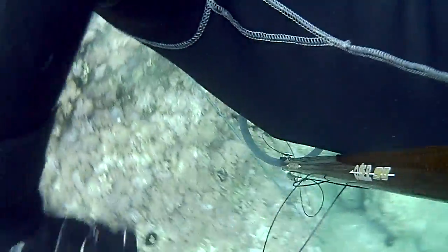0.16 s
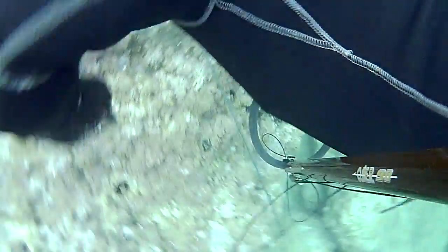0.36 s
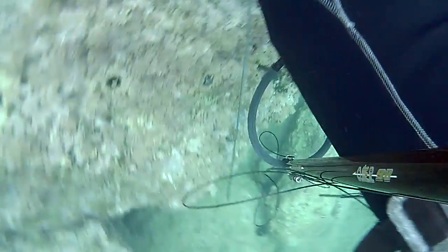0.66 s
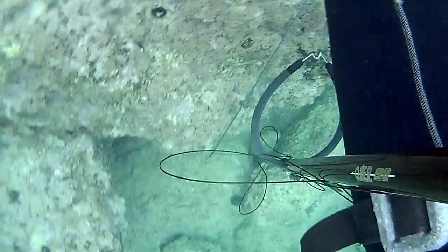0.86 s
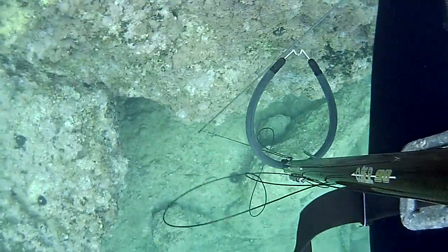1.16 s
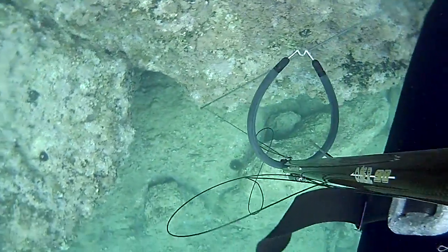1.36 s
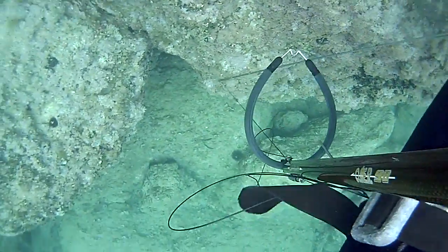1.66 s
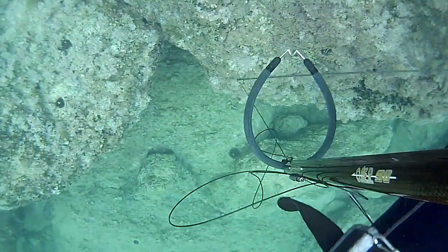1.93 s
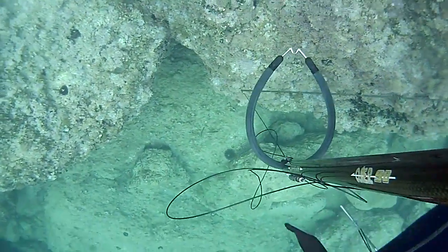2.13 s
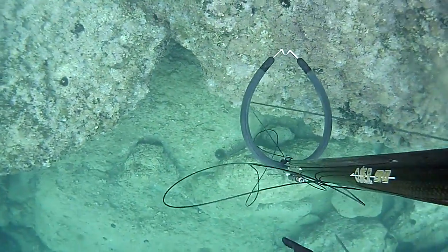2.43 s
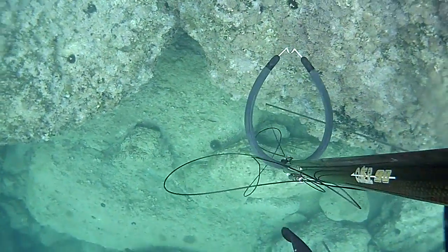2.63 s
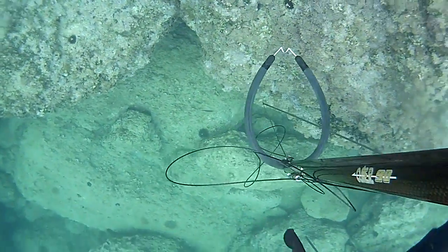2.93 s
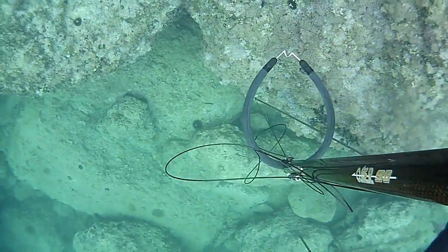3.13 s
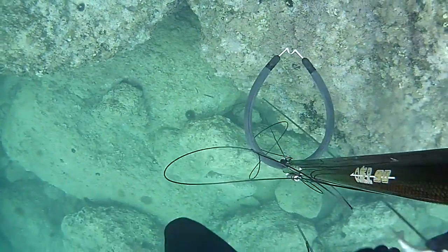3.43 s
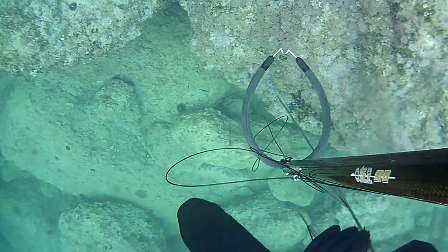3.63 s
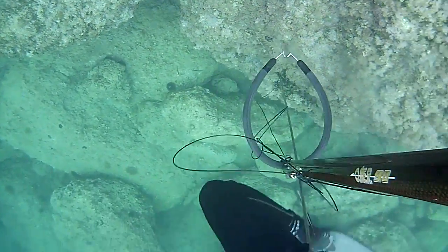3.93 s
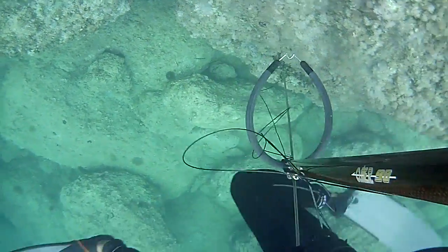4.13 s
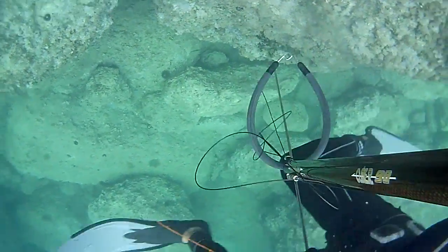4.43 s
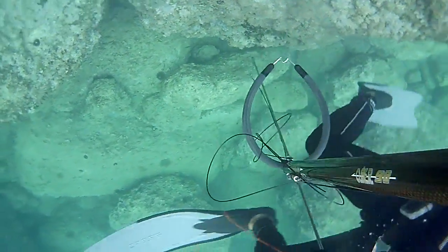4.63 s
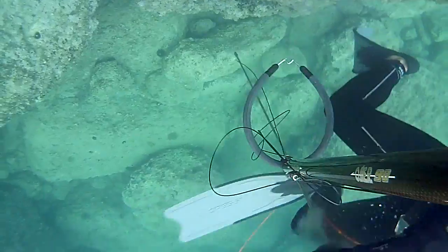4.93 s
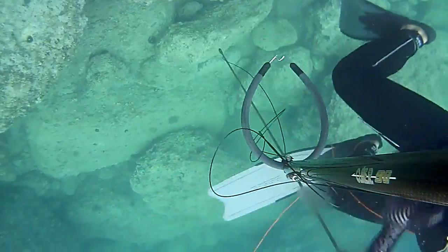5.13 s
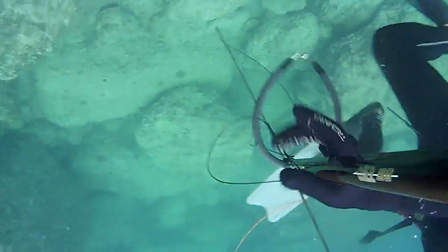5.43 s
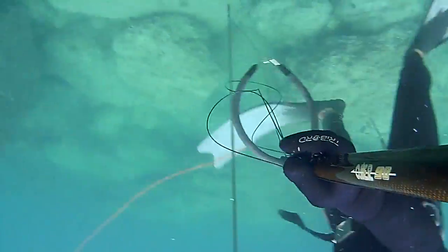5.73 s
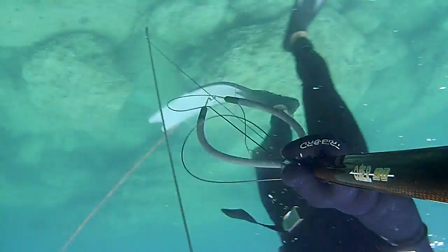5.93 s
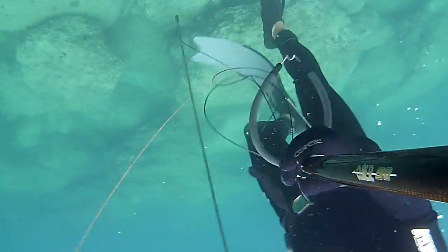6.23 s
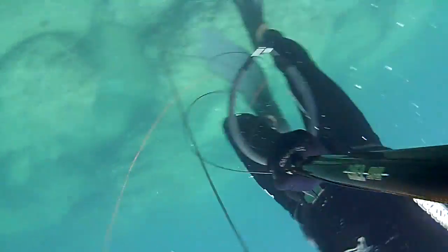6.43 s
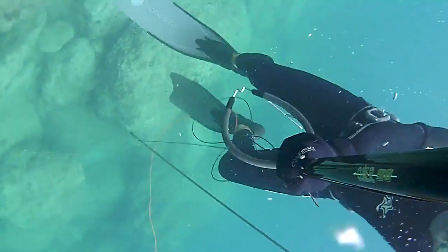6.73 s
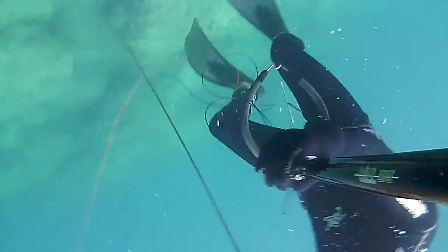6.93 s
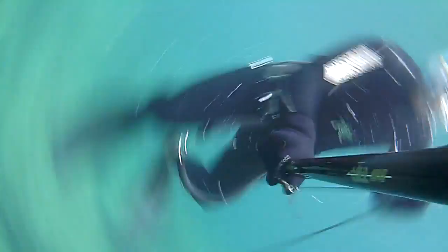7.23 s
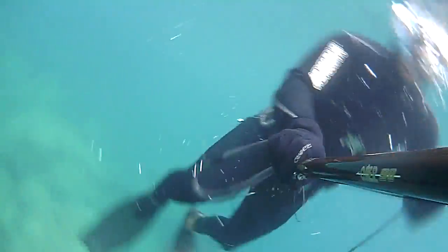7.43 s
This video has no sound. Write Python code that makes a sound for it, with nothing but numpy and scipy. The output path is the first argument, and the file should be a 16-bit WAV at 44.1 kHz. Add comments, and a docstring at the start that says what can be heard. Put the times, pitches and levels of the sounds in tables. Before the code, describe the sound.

Close, dull underwater handling noise from a sealed housing fixed to a wooden speargun. Hollow knocks with a short boxy ring tumble irregularly, burst hard near one second, then thin to faint ticks of loose shaft and line. A sudden very loud knock after four seconds starts dense bumping and rubbing that lasts to the end, with low water rumble. Narrow-band, nearly mono, the loudest hits distort.

```python
"""Knocks on the wooden stock of a speargun, heard from inside a sealed camera housing that rides on it while a diver
climbs, handling gun and line: they travel through the wood and the air space of the housing rings near 500 Hz.
The loose steel shaft and line tick, made as damped sines with a rattle; glove, water and rubber rub on the gun,
made as random slips and noise shaking damped modes of stock, housing and air space.
One narrow-band microphone feeds both channels, the left a little late, and the loudest knocks overload it."""
import sys
import numpy as np
from scipy import signal
from scipy.fft import rfft, irfft
from scipy.io import wavfile

SR = 44100
rng = np.random.default_rng(int(sys.argv[2]) if len(sys.argv) > 2 else 0)


def master_out(mix):
    """Clip the mix to full scale and print it as 16-bit PCM to the path in sys.argv[1]."""
    frames = np.transpose(np.atleast_2d(mix))
    ceiling = np.clip(frames, -1, 1)
    pcm = np.round(ceiling * 32767).astype(np.int16)
    wavfile.write(sys.argv[1], SR, pcm)


N = 333837   # length in samples


def from_db(db):
    """Amplitude factor of a level in dB."""
    return 10 ** (np.asarray(db) / 20)


def rms_one(x):
    """Scale a signal to an rms of 1."""
    return x / np.sqrt(np.mean(x ** 2) + 1e-20)


def in_time(rows):
    """Each column after the first, drawn as straight lines between the times in the first."""
    seconds, *columns = np.transpose(rows)
    return [np.interp(np.arange(N) / SR, seconds, column) for column in columns]


def low_pass(x, hz, order=2):
    """Keep what lies below hz."""
    return signal.sosfilt(signal.butter(order, hz, fs=SR, output="sos"), x)


def high_pass(x, hz, order=2):
    """Keep what lies above hz."""
    return signal.sosfilt(signal.butter(order, hz, "high", fs=SR, output="sos"), x)


def ring(drive, hz, t60):
    """A damped mode: a unit click sets a sine ringing from height 1, down 60 dB after t60 seconds."""
    radius = from_db(-60 / (t60 * SR))
    angle = 2 * np.pi * hz / SR
    # the tiny offset keeps the filter out of denormal numbers
    return signal.lfilter([0, np.sin(angle)], [1, -2 * radius * np.cos(angle), radius ** 2], drive + 1e-18)


def wander(rate_hz, depth_db):
    """A gain that wanders at random: slow noise, its rms depth in dB."""
    return from_db(depth_db * rms_one(low_pass(rng.standard_normal(N), rate_hz)))


def body(drive, modes, colour_db=0):
    """All modes of one part, signs alternating; how hard each is driven wanders, so the colour keeps shifting."""
    out = np.zeros(N)
    for k, (hz, db, t60) in enumerate(modes):
        wandering_drive = drive * wander(25, colour_db)
        out += (-1) ** k * from_db(db) * ring(wandering_drive, hz, t60)
    return out


def grains(per_s, size_db):
    """Slips at random moments and of random sign, a few much larger than the rest."""
    sizes = from_db(size_db * np.minimum(rng.exponential(1, N), 4))
    signs = rng.choice([-1, 1], N)
    return sizes * signs * (rng.random(N) < per_s / SR)


# Modes of the housing walls around the microphone.
# Each row: pitch in Hz, drive in dB against the other rows, t60 in seconds.
WALL_MODES = [(685, 2, 0.033), (790, -2, 0.028), (894, -4.5, 0.031), (1150, 3, 0.01), (1263, -0.5, 0.012),
              (1387, -2, 0.016), (1811, -14.5, 0.033)]


def walls(x):
    """Housing walls shaken by x; their modes fall off steeply above their range."""
    return low_pass(body(x, WALL_MODES, colour_db=4.0), 3000, order=6)


# Modes of the lens port and mount.
# Each row: pitch in Hz, drive in dB against the other rows, t60 in seconds.
PORT_MODES = [(1640, -4.5, 0.024), (1994, -5.5, 0.023), (2230, 1, 0.0028), (2588, -4, 0.013),
              (2970, -10, 0.021), (3150, 1, 0.0062), (3504, 1.5, 0.0071)]


def port(x):
    """Lens port and mount shaken by x; their modes carry little below their range."""
    return high_pass(body(x, PORT_MODES, colour_db=3.5), 1700, order=4)


def scraped(envelope, part, per_s):
    """Slips under a contact envelope shake one part; a steady envelope of 1 gives an rms of about 1."""
    slips = grains(per_s, size_db=2.0)
    return part(envelope * slips) / np.std(part(slips))


# Modes of the wooden stock, kept rumbling by the water and struck by the knocks.
# Each row: pitch in Hz, drive in dB against the other rows, t60 in seconds.
STOCK_MODES = [(64, -14.5, 0.033), (120.4, 1, .12), (217.3, 8, 0.032), (299, -3, 0.054)]


def water_rumble():
    """Water dragging past drives the stock with surging noise, and is heard itself below 60 Hz."""
    water = rng.standard_normal(N) * wander(12, 2.5)
    stock = low_pass(body(water, STOCK_MODES, colour_db=3.5), 260)
    return rms_one(stock) + 0.36 * rms_one(low_pass(water, 60))


def stock_thud(times, peak_db, spread_db=3.0):
    """Each blow pushes inward and strikes every stock mode with a strength of its own."""
    at = (np.asarray(times) * SR).astype(int)
    luck_db = spread_db * rng.standard_normal((len(at), len(STOCK_MODES)))
    out = np.zeros(N)
    for k, (hz, db, t60) in enumerate(STOCK_MODES):
        clicks = np.zeros(N)
        clicks[at] = -from_db(peak_db + db + luck_db[:, k])
        out += ring(clicks, hz, t60)
    return low_pass(out, 1100)


STIR_T60_S = 0.16
# Rubbing stirred up by a knock, in dB against it before smoothing: ring, rumble, grit, fine grit.
STIR_DB = (-20, -17, -29.5, -50)


def stir():
    """Unrest of the grip: it jumps with every knock, since each leaves the grip shifting, and settles."""
    rows = np.array(KNOCKS)
    kicks = np.zeros(N)
    kicks[(rows[:, 0] * SR).astype(int)] = from_db(np.minimum(rows[:, 1], -3))
    settling = signal.lfilter([1], [1, -from_db(-60 / (STIR_T60_S * SR))], kicks)
    return low_pass(settling, 43, order=1)


# Modes of the air space in the housing under steady rubbing.
# Each row: pitch in Hz, drive in dB against the other rows, t60 in seconds.
CAVITY_MODES = [(493.1, 10, 0.023), (473.5, 10, 0.034)]
# Glove, water and rubber dragging on the gun, before the grip's unrest is added.
# Each row: time in seconds, then the rms levels in dB of ring, rumble, grit and fine grit.
RUBBING = [(0.0, -29, -33.5, -46, -76), (0.36, -26.5, -39, -39, -59), (0.53, -42, -63.5, -74, -73),
           (0.78, -61, -59, -49, -62.5), (0.95, -25.5, -34.5, -67, -57.5),
           (1.1, -28.5, -34.5, -40.5, -76.5), (1.24, -44, -62.5, -76.5, -75),
           (1.45, -57.5, -56, -73.5, -74), (1.64, -40.5, -38.5, -58, -73), (2.19, -68.5, -66.5, -78, -78.5),
           (2.53, -42.5, -43, -55, -71), (2.72, -42, -48.5, -54.5, -59), (3.65, -70, -70, -79, -80),
           (4.11, -60.5, -62.5, -71, -77.5), (4.26, -22.5, -36, -43.5, -78.5), (4.87, -33, -32, -50, -68.5),
           (5.0, -18, -35, -39, -55.5), (5.19, -48.5, -54, -79.5, -77), (5.46, -54, -61.5, -58, -63),
           (5.61, -31, -26.5, -32.5, -42), (5.97, -47.5, -32.5, -49.5, -69), (6.39, -22, -18.5, -24, -47),
           (6.6, -37, -31, -54.5, -67), (6.81, -35, -29, -41.5, -69), (7.02, -35, -38.5, -47.5, -56),
           (7.19, -43, -24, -47, -54.5), (7.36, -50, -33.5, -43.5, -56), (7.57, -48.5, -42.5, -50, -77)]


def rubbing():
    """Slips of wandering strength shake air space, walls and port; water dragging past rumbles the stock."""
    slips = grains(per_s=1200, size_db=4.5) * wander(6.1, 3.7)
    fine_slips = grains(per_s=900, size_db=3.0) * wander(25, 4.0)
    parts = body(slips, CAVITY_MODES), water_rumble(), walls(slips), port(fine_slips)
    unrest = stir()
    out = np.zeros(N)
    for db, stir_db, part in zip(in_time(RUBBING), STIR_DB, parts):
        level = np.hypot(from_db(db), from_db(stir_db) * unrest)
        out += level * rms_one(part)
    return out


# Ticks of the loose steel shaft and the line.
# Each row: start in seconds, level in dB before the trims of ping and rattle, pitch in Hz, ping t60 in seconds.
TICKS = [(0.0999, -35, 1696, 0.02), (0.177, -36, 1920, 0.028), (0.2713, -28, 1660, 0.027),
         (0.4274, -53, 1660, 0.03), (0.5422, -50, 1970, 0.025), (0.608, -60, 2640, 0.025),
         (0.6577, -49.5, 1760, 0.032), (0.6857, -37, 1920, 0.034), (0.7184, -41.5, 1920, 0.03),
         (0.847, -58, 1520, 0.03), (1.3736, -55.5, 2570, 0.058), (1.4054, -49, 1640, 0.025),
         (1.585, -51, 2530, 0.026), (1.641, -49, 1670, 0.023), (1.736, -42, 1760, 0.019),
         (1.7764, -38, 2620, 0.031), (1.8442, -41, 1587, 0.035), (1.9054, -63, 2600, 0.03),
         (2.0017, -46, 1910, 0.039), (2.04, -49.5, 2640, 0.03), (2.1191, -48, 1930, 0.033),
         (2.2641, -36.5, 1930, 0.024), (2.374, -50, 2620, 0.061), (2.3934, -50, 1880, 0.023),
         (2.4757, -54, 1760, 0.019), (2.5377, -47.5, 2510, 0.035), (2.549, -46, 1970, 0.026),
         (2.5684, -50, 1720, 0.034), (2.6857, -38, 2610, 0.038), (2.7325, -46, 1740, 0.026),
         (2.842, -48, 1830, 0.038), (2.8604, -47, 1760, 0.09), (2.9134, -46, 1900, 0.045),
         (3.0896, -47, 2670, 0.046), (3.1125, -51, 2600, 0.046), (3.1393, -47, 2590, 0.043),
         (3.1827, -48, 2630, 0.021), (3.263, -55, 2030, 0.019), (3.2929, -55, 2970, 0.024),
         (3.4251, -43, 2580, 0.035), (3.4586, -51, 2630, 0.023), (3.4963, -58.5, 2530, 0.028),
         (3.6267, -44.5, 1990, 0.016), (3.693, -45, 2640, 0.036), (3.7429, -49.5, 1940, 0.022),
         (3.7796, -45.5, 1975, 0.037), (3.8278, -57, 1950, 0.028), (3.9065, -31.5, 1940, 0.019),
         (3.9284, -50.5, 2590, 0.049), (4.0806, -4, 1490, 0.023), (5.2096, -60, 1980, 0.025),
         (5.231, -47, 1970, 0.036), (5.2444, -49.5, 1930, 0.045), (5.2744, -58, 1960, 0.046),
         (5.3444, -49, 2510, 0.041), (5.3566, -40.5, 1950, 0.024), (5.4036, -45.5, 1500, 0.03),
         (5.5416, -25.5, 1510, 0.015), (5.5878, -21.5, 1610, 0.049), (5.7039, -26.5, 1880, 0.02),
         (5.7441, -28.5, 1680, 0.038), (6.0236, -47, 1540, 0.033), (6.2463, -27.5, 1715, 0.021),
         (6.4182, -19.5, 1680, 0.035), (6.4353, -29, 1860, 0.023), (6.7726, -40, 1700, 0.036),
         (6.9102, -41, 2000, 0.029), (7.154, 1, 1529, 0.018), (7.214, -47, 1720, 0.026),
         (7.244, -35, 1510, 0.02), (7.3616, -38, 1550, 0.03), (7.5081, -25.5, 1766, 0.035)]


def ticks():
    """A ragged rattle into port and mount, with a ping where one mode is caught best."""
    rattle, ping = np.zeros((2, N))
    for start, db, hz, t60 in TICKS:
        i = int(start * SR)
        t = np.arange(min(int(t60 * SR), N - i)) / SR
        rattle[i:i + len(t)] += from_db(db - 75 * t / t60)
        rise = 1 - np.exp(-t / 0.0011)
        ping[i:i + len(t)] -= from_db(db - 60 * t / t60) * rise * np.sin(2 * np.pi * hz * t)
    return from_db(4.5) * scraped(rattle, port, 3100) + from_db(5.0) * ping


# Knocks on the stock, heard through wood and housing.
# Each row: start in seconds, ring level in dB before its wavering, ring pitch in Hz, contact in seconds,
# ring t60 in seconds, then thud, crack and edge in dB against the ring, before their trims.
KNOCKS = [(0.006, -11, 468, 0.003, 0.088, -12, -17.5, -18.5),
          (0.067, -22.5, 478, 0.0085, 0.048, 0.5, -13.5, -37),
          (0.131, -15.5, 484, 0.012, 0.055, -2, -15.5, -34),
          (0.165, -22, 509, 0.015, 0.055, -4, -10, -24.5),
          (0.205, -21.5, 482, 0.0058, 0.055, -28, -13, -41),
          (0.222, -12, 483, 0.0086, 0.049, -11, -14.5, -53), (0.278, -19, 528, 0.01, 0.057, -1.5, -12, -23),
          (0.297, -8, 494, 0.0071, 0.037, -21.5, -19, -29),
          (0.345, -16, 509, 0.006, 0.064, -4, -14.5, -19.5),
          (0.368, -7.5, 493, 0.013, 0.074, -11, -21, -29), (0.458, -12, 501, 0.0051, 0.14, -19, -26.5, -22),
          (0.47, -12.5, 493, 0.008, 0.13, -14.5, -23, -35), (0.506, -26, 483, 0.012, 0.076, -6, -11.5, -12),
          (0.526, -19, 488.4, 0.011, 0.11, -22.5, -24, -32),
          (0.692, -23.5, 477, 0.015, 0.14, -28, -17, -23), (0.742, -27.5, 473, 0.0079, 0.17, -15, -11, -16),
          (0.791, -16, 470, 0.008, 0.087, -5, -13, -22), (0.855, -32.5, 538, 0.02, 0.084, 6, -22, -27),
          (0.868, -16.5, 514, 0.009, 0.044, -14, -19, -49),
          (0.892, -30, 468, 0.0044, 0.061, -3, -10.5, -25.5),
          (0.933, 5, 472.4, 0.012, 0.026, -13.5, -12.5, -13.5),
          (0.956, -6.5, 446, 0.0095, 0.047, -5.5, -2.5, -20),
          (0.968, -0.5, 483, 0.013, 0.019, -14.5, -11.5, -13.5),
          (0.993, -11, 394, 0.019, 0.03, -6, -7, -15.5), (1.006, -4, 482, 0.02, 0.034, -16, -13, -24),
          (1.038, -6, 482, 0.0055, 0.049, -12, -13, -26.5), (1.056, -8, 506, 0.012, 0.05, -25, -16.5, -29),
          (1.081, -19, 472, 0.009, 0.072, -10.5, -13, -43),
          (1.11, -19.5, 435, 0.011, 0.055, -12.5, -29, -40),
          (1.123, -21, 464, 0.013, 0.055, -15, -10.5, -37),
          (1.144, -30, 425, 0.0085, 0.055, 3.5, -13, -36.5),
          (1.16, -16.5, 446, 0.008, 0.066, -15.5, -8.5, -26),
          (1.17, -9.5, 485, 0.0081, 0.062, -12.5, -28, -49),
          (1.206, -25, 475, 0.0074, 0.055, 0, -33.5, -39.5), (1.224, -27, 473, 0.0082, 0.11, -5, -5.5, -21),
          (1.266, -24, 505, 0.013, 0.068, -21, -19, -43.5), (1.386, -30, 452, 0.011, 0.036, -31, -45, -37),
          (1.427, -25, 480, 0.0058, 0.082, -8.5, -18, -32), (1.455, -31, 486, 0.015, 0.05, 4.5, -12, -24),
          (1.491, -45, 445, 0.009, 0.055, 3, -7, -17), (1.53, -25.5, 484, 0.0075, 0.084, -7, -12.5, -30),
          (1.554, -34.5, 474, 0.0083, 0.085, -7, -23, -40), (1.579, -38, 452, 0.0072, 0.074, -15, -29, -34),
          (1.638, -22, 465, 0.0041, 0.15, -13, -16.5, -25.5),
          (1.667, -18, 471, 0.011, 0.055, -7.5, -18.5, -32),
          (1.692, -9.5, 472, 0.0075, 0.09, -10, -21.5, -37),
          (1.738, -25, 408, 0.012, 0.055, -13, -4.5, -37), (1.751, -19, 448, 0.015, 0.052, -4.5, -31, -44),
          (1.761, -11.5, 462, 0.0078, 0.072, -17.5, -24, -40),
          (1.797, -23, 503, 0.014, 0.055, -10, -22.5, -30),
          (1.865, -36.5, 413, 0.0058, 0.074, -6, -26, -32),
          (1.956, -30.5, 475, 0.011, 0.034, -7, -34.5, -55),
          (2.03, -47, 473, 0.0065, 0.052, -2.5, -25, -15),
          (2.236, -54.5, 470, 0.009, 0.055, -9.5, -10, 6.5),
          (2.303, -26.5, 461.5, 0.012, 0.17, -3.5, -19.5, -31),
          (2.336, -28.5, 449, 0.0084, 0.13, -9, -19, -22), (2.401, -23, 480, 0.0069, 0.076, -5, -16.5, -12),
          (2.5, -30, 470, 0.0071, 0.055, -7, -46, -48), (2.529, -34.5, 465, 0.008, 0.055, -1, -21, -28),
          (2.545, -37.5, 487, 0.012, 0.063, -3, -19, -10), (2.587, -24, 478, 0.0077, 0.13, -6, -18, -42),
          (2.628, -33.5, 454, 0.011, 0.055, 1, -31, -44),
          (2.674, -25.5, 463, 0.0077, 0.14, -11.5, -53, -34), (2.737, -40, 453, 0.016, 0.055, -7, -29, -8),
          (2.784, -22, 452, 0.0075, 0.17, -38.5, -20, -19), (2.813, -28.5, 491, 0.027, 0.17, -38, -18, -17),
          (2.85, -27.5, 490, 0.027, 0.17, -34, -17.5, -32), (2.881, -30, 483, 0.0082, 0.1, -19, -14, -21),
          (2.924, -30.5, 494, 0.021, 0.079, -21, -7, -10), (2.949, -42, 498, 0.013, 0.039, -21, -0.5, -4),
          (3.083, -39.5, 518, 0.012, 0.055, -20, -7.5, -23),
          (3.129, -43.5, 463, 0.0041, 0.039, -22, -15, -9), (3.185, -33, 474, 0.009, 0.073, -5, -16.5, -29),
          (3.23, -43, 486, 0.015, 0.055, 7.5, -30, -23), (3.267, -32.5, 469, 0.008, 0.1, 2, -20, -35),
          (3.387, -25, 490, 0.0074, 0.17, -4, -30, -37), (3.653, -42.5, 463, 0.012, 0.074, -31, -43.5, -21),
          (4.081, 9.5, 493, 0.0093, 0.083, -28.5, -9.5, -20), (4.095, 2.5, 501, 0.012, 0.06, -26, -9.5, -6),
          (4.109, 6.5, 478, 0.0054, 0.035, -36, -4, -38), (4.121, 1, 493, 0.015, 0.044, -15, -5.5, -7.5),
          (4.144, -16.5, 436, 0.0063, 0.03, -11.5, -27, -1.5),
          (4.162, 0.5, 459.5, 0.009, 0.12, -18.5, -15, -19),
          (4.177, -1, 514, 0.0047, 0.02, -16, -8.5, -10.5),
          (4.189, -1.5, 492, 0.014, 0.033, -20, -15, -18.5),
          (4.215, -10.5, 403, 0.0081, 0.032, -3.5, -10, -23),
          (4.235, -14.5, 439, 0.013, 0.037, -5, -11, -25), (4.25, -13, 458, 0.016, 0.059, -23, -12, -26.5),
          (4.268, -15, 482, 0.011, 0.062, -16, -10.5, -28),
          (4.291, -19.5, 485, 0.0061, 0.077, -22, -10, -32),
          (4.325, -32.5, 490, 0.015, 0.055, -14.5, -13, -35),
          (4.344, -28, 480, 0.0098, 0.055, -3, -9.5, -37), (4.375, -15, 471, 0.011, 0.081, -16, -24.5, -51),
          (4.404, -19, 466, 0.016, 0.055, -17.5, -12.5, -49),
          (4.452, -17.5, 485, 0.016, 0.055, -15.5, -15.5, -45),
          (4.493, -9, 439, 0.0063, 0.048, -17, -14.5, -27), (4.51, -9, 479, 0.01, 0.029, -19.5, -13, -23.5),
          (4.534, -10, 509, 0.019, 0.044, -4, -11.5, -21.5),
          (4.571, -16, 475, 0.0078, 0.034, -4.5, -5, -20), (4.592, -16.5, 463, 0.015, 0.046, -2, -8, -16),
          (4.613, -8.5, 478, 0.0058, 0.031, -10, -22, -31), (4.631, -37, 509, 0.012, 0.081, 4.5, 0, -34),
          (4.665, -17, 505, 0.0066, 0.076, -14.5, -25.5, -43),
          (4.69, -12.5, 490, 0.01, 0.044, -13, -16.5, -32),
          (4.732, -27.5, 463, 0.0054, 0.055, -3, -5.5, -41),
          (4.763, -32.5, 347, 0.009, 0.045, -3, 1, -50.5), (4.84, -0.5, 483, 0.013, 0.028, -27.5, -13, -23),
          (4.862, -5, 502, 0.012, 0.075, -18, -10.5, -22),
          (4.884, -5.5, 493, 0.01, 0.035, -6.5, -8.5, -22.5),
          (4.904, -6.5, 486, 0.013, 0.039, -7, -13, -28), (4.938, -14, 470, 0.0086, 0.068, -25, -15.5, -39),
          (4.954, -2, 483, 0.014, 0.084, -30, -20, -26), (4.982, -6.5, 510, 0.013, 0.064, -8, -16.5, -31),
          (5.005, -11.5, 435, 0.0082, 0.055, -18, -13, -28.5),
          (5.035, -22, 406, 0.0064, 0.055, -13, -13, -28.5),
          (5.055, -15.5, 442, 0.016, 0.055, -1, -14.5, -23.5),
          (5.084, -9.5, 490.5, 0.0098, 0.073, -12, -20.5, -28.5),
          (5.12, -21.5, 444, 0.0041, 0.055, -16, -8.5, -17),
          (5.143, -12.5, 498, 0.008, 0.085, -23, -17.5, -26),
          (5.218, -45, 460, 0.013, 0.034, -12.5, -41, -16), (5.266, -33, 493, 0.0086, 0.06, -7.5, -38, -23),
          (5.33, -46, 464, 0.009, 0.047, 1.5, -36, -9), (5.426, -23, 388, 0.013, 0.052, 10, -4, -6),
          (5.452, -16, 554, 0.0052, 0.048, 0, 2, -10.5), (5.459, -22, 390, 0.009, 0.082, 1, -11, -19),
          (5.471, -16.5, 484, 0.0053, 0.05, 0.5, -12.5, -23),
          (5.484, -9, 501, 0.0082, 0.069, -1.5, -15, -16), (5.495, -17.5, 534, 0.01, 0.045, -5, -5.5, -19),
          (5.511, -15.5, 487, 0.0064, 0.055, -2, -6.5, -15),
          (5.523, -15, 450, 0.013, 0.055, 0, -12.5, -17.5),
          (5.548, -18.5, 448, 0.024, 0.09, -9.5, -5.5, -27),
          (5.571, -8.5, 512, 0.011, 0.03, 0, -10.5, -14.5),
          (5.586, -6.5, 582, 0.0073, 0.036, -1, -13.5, -26),
          (5.6, -3, 508, 0.0079, 0.067, -6.5, -11.5, -18),
          (5.62, -18.5, 486, 0.009, 0.055, -3.5, -10, -24.5),
          (5.661, -34, 449, 0.0084, 0.063, -15.5, -14.5, -21),
          (5.671, -6.5, 430, 0.0059, 0.018, -21.5, -15.5, -23.5),
          (5.687, -14.5, 452, 0.0067, 0.066, -18.5, -16, -17.5),
          (5.697, -12, 488, 0.0062, 0.15, -31, -19.5, -17.5),
          (5.727, -13, 485, 0.005, 0.15, -12.5, -13.5, -33),
          (5.751, -10, 643, 0.004, 0.023, -19.5, -21.5, -28),
          (5.818, -14.5, 646, 0.011, 0.1, -4.5, -5, -19), (5.845, -11, 486, 0.017, 0.1, -17, -16.5, -31),
          (5.92, -27.5, 463, 0.013, 0.04, -21.5, -5, -46), (5.932, -17, 497, 0.016, 0.13, -8.5, -12.5, -33),
          (6.054, -19, 470, 0.0097, 0.065, -17, -2, -19.5),
          (6.069, -5.5, 499.4, 0.0076, 0.11, -17, -12.5, -19.5),
          (6.157, -15, 656, 0.011, 0.045, -4.5, -8.5, -22),
          (6.212, -13, 483, 0.01, 0.055, -5.5, -14.5, -27),
          (6.221, -12, 475, 0.016, 0.1, -21.5, -16.5, -46),
          (6.254, -16.5, 474, 0.009, 0.047, -4.5, -29, -38), (6.287, -16, 476, 0.012, 0.039, -12, -28, -22),
          (6.31, -17, 533, 0.009, 0.055, 2.5, -7, -22.5), (6.348, -8, 503, 0.014, 0.12, -8.5, -13, -23),
          (6.378, -13, 434, 0.006, 0.055, -9, -22, -14), (6.389, -16.5, 474, 0.0051, 0.025, -6, -10, -23),
          (6.417, -6, 456, 0.0074, 0.041, -17, -12, -14), (6.429, -0.5, 460, 0.0056, 0.063, -4.5, -3, -8),
          (6.444, -15.5, 522, 0.0081, 0.018, -15, -16, -9.5),
          (6.47, -1, 513, 0.0031, 0.044, -16, -12.5, -18.5),
          (6.492, -32, 500, 0.0067, 0.055, -8.5, -22.5, -10), (6.51, -18.5, 370, 0.0057, 0.039, 8, -7, -30),
          (6.533, -40.5, 533, 0.0064, 0.047, 13.5, -18, -37),
          (6.555, -11, 440, 0.0094, 0.028, -23.5, -10, -23),
          (6.574, -4, 492.5, 0.0076, 0.12, -5.5, -3.5, -18),
          (6.65, -17.5, 490, 0.014, 0.082, -2, -18.5, -41), (6.698, -23.5, 467, 0.013, 0.055, -1, -14, -43),
          (6.725, -31.5, 483, 0.0062, 0.055, -2, -17, -33), (6.752, -28, 468, 0.0075, 0.055, -5, -7.5, -35),
          (6.77, -25.5, 475, 0.0068, 0.055, 0.5, -3, -30), (6.784, -14.5, 501, 0.0087, 0.13, -3, -10, -51),
          (6.827, -20, 469, 0.0085, 0.055, -13.5, -4.5, -31),
          (6.873, -29, 480, 0.01, 0.055, -2, -28.5, -41), (6.923, -19, 668, 0.0051, 0.04, -22, -10, -18),
          (6.944, -16.5, 495, 0.0099, 0.069, -21, -19, -17),
          (6.961, -19.5, 478, 0.0048, 0.049, -13, -14, -24),
          (6.973, -14.5, 428, 0.0098, 0.04, -5, -21.5, -22),
          (6.986, -1, 487, 0.0073, 0.08, -8.5, -1.5, -14), (7.001, -1.5, 485, 0.01, 0.069, -11.5, -20, -26),
          (7.03, -10.5, 375, 0.0095, 0.047, -3, -4, -18), (7.044, -10, 509, 0.012, 0.1, -9.5, -5.5, -16),
          (7.066, -10.5, 467, 0.011, 0.066, -8, -24, -28), (7.092, -10.5, 492, 0.013, 0.081, -20, -15, -58),
          (7.124, -21.5, 501, 0.0077, 0.055, -3, -31, -44), (7.139, -12.5, 423, 0.0053, 0.033, -1, -8, -7),
          (7.151, -4, 499, 0.0035, 0.11, -6.5, -5, 3), (7.167, -19.5, 460, 0.0084, 0.055, -1, -7, -12),
          (7.178, -19.5, 508, 0.015, 0.067, -1, -30, -28), (7.284, -5, 499, 0.0053, 0.063, -9, -9.5, -19),
          (7.297, 0.5, 500, 0.0095, 0.15, -9, -9.5, -21), (7.411, -14, 511, 0.011, 0.11, -22, -7.5, -25.5),
          (7.508, -13.5, 501, 0.0054, 0.093, -13.5, -9.5, -28),
          (7.559, -19, 472, 0.009, 0.055, -21, -36, -34)]
SWELL_SHARE = 0.34   # swell time as a share of the contact; the ring is full after 0.61 of the swell


def knocks():
    """The air space swells, holds while the contact lasts, then dies; the next contact damps it."""
    cavity, crack, edge = np.zeros((3, N))
    rows = np.array(KNOCKS)
    starts, peak_db, thud_db = rows[:, 0], rows[:, 1], rows[:, 5]
    swells = SWELL_SHARE * rows[:, 3]
    ends = list(starts[1:] + swells[1:]) + [N / SR]
    for (start, db, hz, touch, t60, _, crack_db, edge_db), swell, end in zip(KNOCKS, swells, ends):
        i = int(start * SR)
        t = np.arange(min(int((touch + t60) * SR), N - i)) / SR
        here = slice(i, i + len(t))
        rise = np.sin(np.pi / 2 * np.clip(0.14 + 1.4 * t / swell, 0, 1)) ** 2
        after = np.maximum(t - touch, 0)   # seconds since the contact ended
        damped = from_db(-900 * np.maximum(t - (end - start), 0))
        cavity[here] -= from_db(db - 60 * after / t60) * rise * damped * np.sin(2 * np.pi * hz * t)
        # the scrape fades sooner than the ring
        contact = from_db(db - 60 * after / min(t60, .03) - 320 * t) * rise
        crack[here] += from_db(crack_db) * contact
        edge[here] += from_db(edge_db) * contact
    cavity *= wander(90, 2.5)   # the ring wavers quickly in level
    thud = from_db(-4.5) * stock_thud(starts + swells / 2, peak_db + thud_db)
    bright = from_db(2.0) * scraped(crack, walls, 2000) + from_db(-2.5) * scraped(edge, port, 4300)
    return cavity + thud + bright


def scene():
    """Everything reaches one microphone in the housing, which does not follow steady pressure."""
    mono = high_pass(rubbing() + ticks() + knocks(), 40)
    return np.array([mono, mono])


CONVERTER_TOP = 1.2   # overload point, full scale = 1
MIC_STOP_HZ, CUTOFF_HZ = 4538, 16500   # where the two low-passes are 70 and 60 dB down
LEFT_LAG_S = 1 / 8000


def record(dry):
    """The converter overloads and is narrow-band; the left is late; overshoot is clipped; hiss; top cut."""
    overloaded = np.clip(dry, -CONVERTER_TOP, CONVERTER_TOP)
    narrow = signal.sosfilt(signal.cheby2(10, 70, MIC_STOP_HZ, fs=SR, output="sos"), overloaded)
    # a delay by a fraction of a sample, as a phase slope over a padded spectrum
    size = 2 ** 19
    cycles_per_sample = np.arange(size // 2 + 1) / size
    delay = np.exp(-2j * np.pi * LEFT_LAG_S * SR * cycles_per_sample)
    late = irfft(rfft(narrow[0], size) * delay)[:N]
    clipped = np.clip([late, narrow[1]], -1, 1)
    hiss = from_db(-104) * rng.standard_normal((2, N))
    top_cut = signal.cheby2(12, 60, CUTOFF_HZ, fs=SR, output="sos")
    return np.clip(signal.sosfilt(top_cut, clipped + hiss), -1, 1)


dry = scene()
out = record(dry)
master_out(out)
```